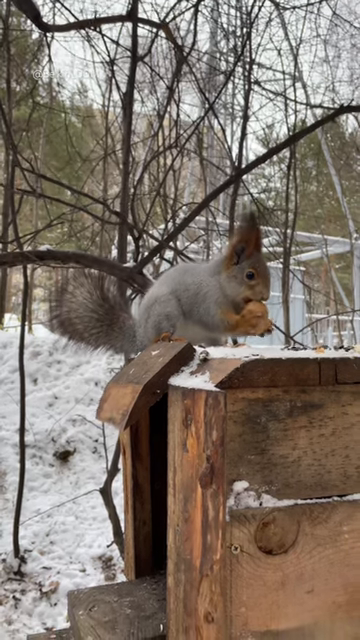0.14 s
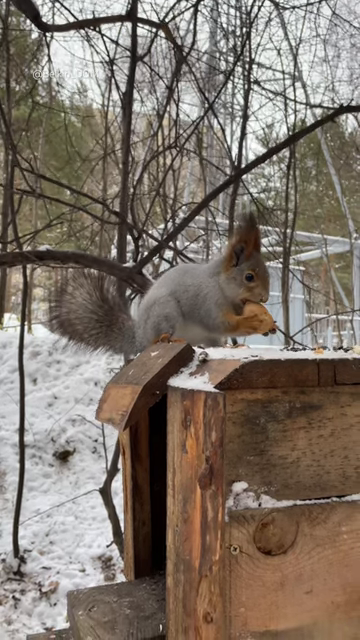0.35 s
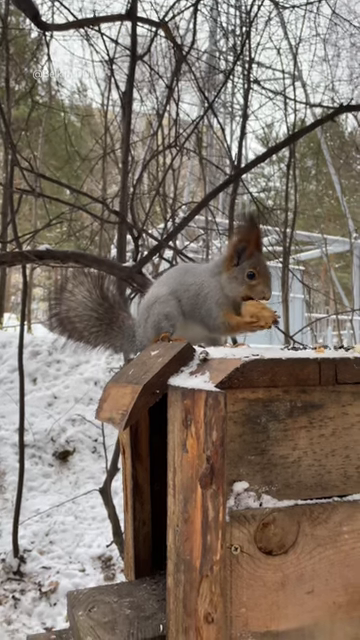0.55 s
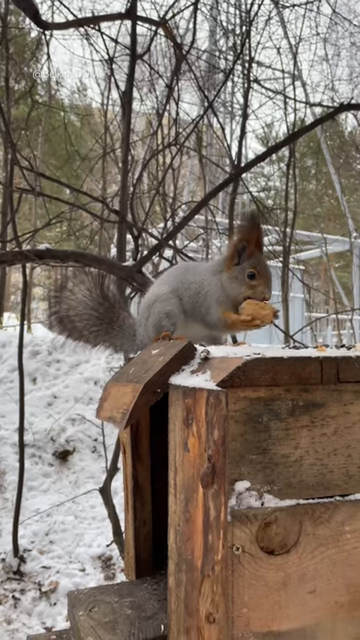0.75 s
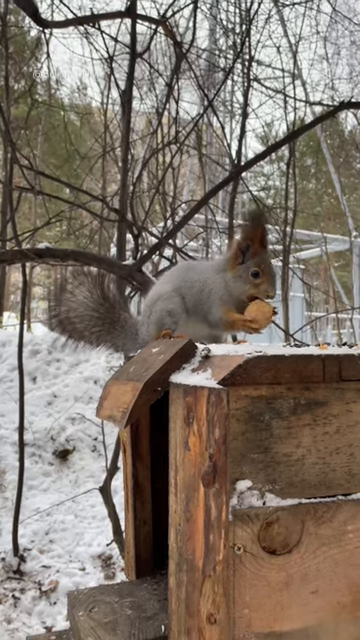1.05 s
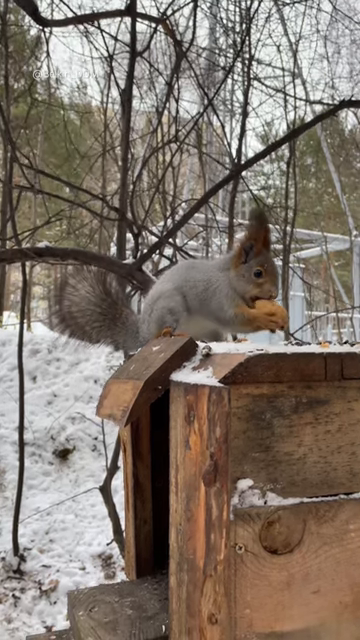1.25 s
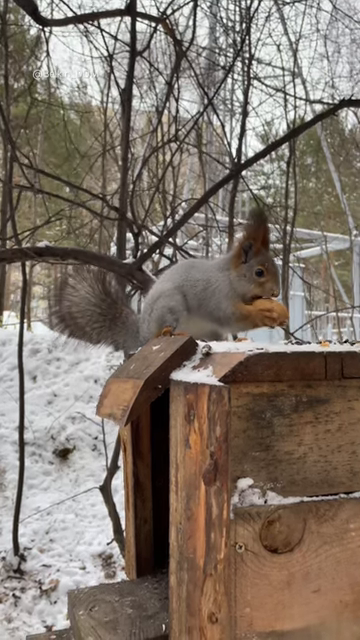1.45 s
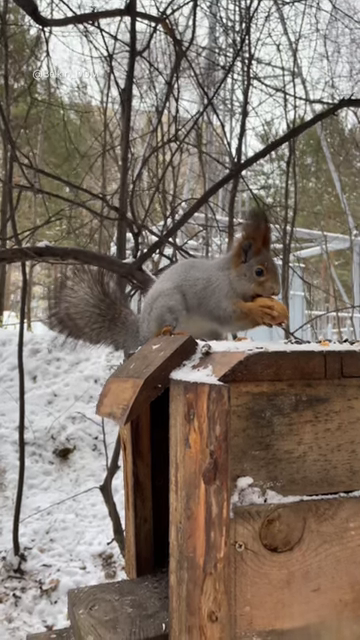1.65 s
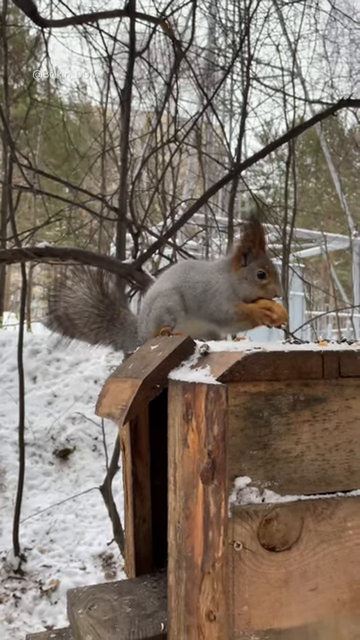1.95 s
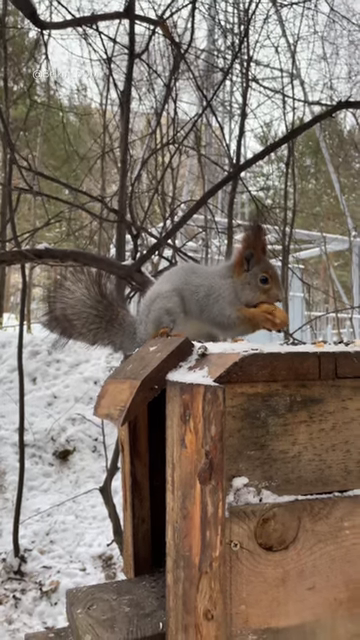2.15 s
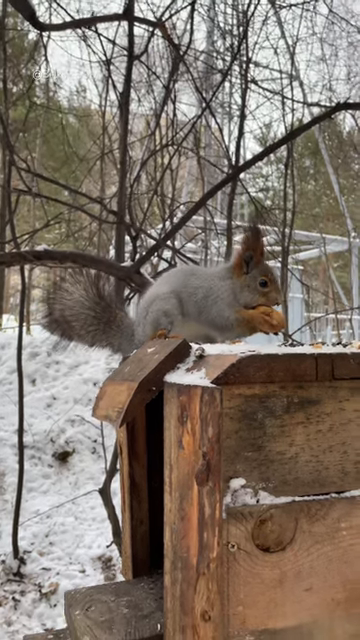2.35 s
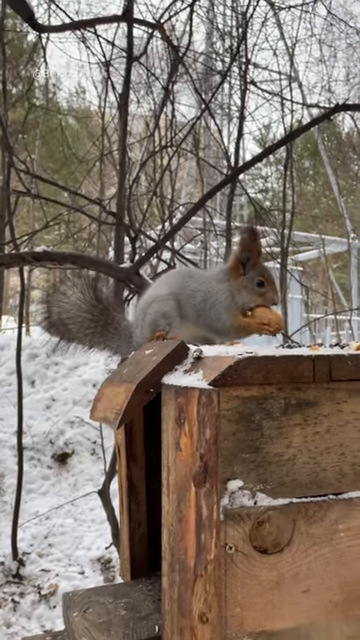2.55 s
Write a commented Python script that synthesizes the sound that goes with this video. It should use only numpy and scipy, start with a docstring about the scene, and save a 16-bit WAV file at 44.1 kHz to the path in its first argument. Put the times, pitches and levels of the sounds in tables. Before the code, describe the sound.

Dry ticking and cracking of a nutshell in a squirrel's teeth, thin bird calls, distant town rumble

```python
"""Dry ticks, snaps, knocks and fine crackle: close by, a squirrel gnaws a nut on a wooden feeder.
Behind it small birds call thinly among the trees, a harsh call dies away and a distant town rumbles.
The nut is clicks, rattles and tiny grains that ring a body. The birds are gliding tones and shaped noise.
The town is coloured noise whose deep part swells and sinks, under a faint hiss."""
import sys
import numpy as np
from scipy import signal
from scipy.fft import rfft, irfft
from scipy.io import wavfile
from scipy.ndimage import uniform_filter1d

SR = 44100
rng = np.random.default_rng(int(sys.argv[2]) if len(sys.argv) > 2 else 0)


def unload_wav(signal):
    """Save mono or channel-first audio to the path in sys.argv[1] as 16-bit WAV at rate SR, clipped to [-1, 1]."""
    wavfile.write(
        sys.argv[1],
        SR,
        np.round(np.clip(np.atleast_2d(signal).T, -1, 1) * 32767).astype(np.int16),
    )


N = 118629  # length in samples
T = np.arange(N) / SR  # time in seconds
HZ = np.fft.rfftfreq(N, 1 / SR)

# Colour of the town's wash. Each row: pitch in Hz, relative strength in dB per Hz.
TOWN_COLOUR = [(12, -79), (25, -39), (34, -10), (44, -3), (56, 1), (72, -3.5), (95, -5.5), (125, -14),
               (148, -9), (168, -12), (200, -10.5), (250, -11.5), (310, -16.5), (490, -17), (600, -20.5),
               (850, -20.5), (1250, -27), (1700, -34.5), (2200, -38.5), (2600, -36.5)]
# How alike the wash is in both ears. Each row: pitch in Hz, likeness from 0 to 1.
TOWN_LIKENESS = [(30, 0.93), (125, 0.99), (250, 0.99), (500, 0.59), (1000, 0.31), (2000, 0.5),
                 (4000, 0.036), (12000, .1)]
# Side of the wash. Each row: pitch in Hz, left minus right in dB.
TOWN_BALANCE = [(30, -0.5), (90, 0.8), (180, 2.5), (350, 2.5), (700, 2.5), (1400, -3.5), (2500, 1.5)]
# Rise and fall of the deep rumble, before RUMBLE_SWING scales it. Each row: time in seconds, level in dB.
RUMBLE_SWELL = [(0.0, -43.5), (0.19, -48), (0.221, -51.5), (0.54, -50.5), (0.61, -32.5), (0.67, -45.5),
                (0.92, -45), (0.98, -55.5), (1.06, -35), (1.11, -43.5), (1.15, -39.5), (1.24, -45),
                (1.27, -42), (1.5, -41.5), (1.71, -56.5), (1.8, -30.5), (1.84, -62), (1.9, -44.5),
                (2.01, -49), (2.07, -50.5), (2.17, -58), (2.25, -47.5), (2.51, -39), (2.53, -61),
                (2.58, -44.5), (2.69, -40.5)]
# Colour of the faint hiss. Each row: pitch in Hz, relative strength in dB per Hz.
HISS_COLOUR = [(1500, -42), (2800, 7.5), (4500, 6), (6500, -1), (8000, -12), (9700, 2.5), (11000, -5),
               (12600, -1), (14300, -24), (15700, -5)]
# Colour of the harsh call's rasp. Each row: pitch in Hz, relative strength in dB.
CAW_COLOUR = [(700, -14), (1250, -2), (1570, 4), (1900, -8), (2400, -16), (2950, -26), (3800, -14.5),
              (5000, -18), (6000, -34), (9000, -41)]
# Thin bird whistles. Each row: start in seconds, length in seconds, start pitch in Hz, middle pitch in Hz,
# end pitch in Hz, level in dB, left minus right in dB.
WHISTLES = [(0.203, 0.063, 7000, 7020, 6800, -76, 5), (0.691, .062, 6730, 7130, 6800, -63.5, 2),
            (0.98, 0.064, 7140, 7040, 6600, -74.5, 3), (1.148, .06, 6550, 7290, 7260, -62.5, 0),
            (1.922, 0.068, 6800, 7200, 7030, -68, 2), (2.296, 0.034, 5420, 4980, 4740, -70.5, -14)]
# Hoarse far bird calls. Each row: start in seconds, length in seconds, level in dB.
HOARSE_CALLS = [(0.87, 0.1, -70.5), (1.402, 0.064, -68.5), (1.696, 0.09, -72), (2.279, 0.093, -70.5)]
# Colour of the hoarse calls. Each row: pitch in Hz, relative strength in dB.
HOARSE_COLOUR = [(2000, -18), (3200, -8), (4300, -9), (5200, -9), (6500, -23), (9000, -29)]
# Scrapes of the teeth. Each row: start in seconds, length in seconds, level in dB.
SCRAPES = [(0.317, 0.14, -68.5), (0.509, 0.1, -71), (0.75, 0.096, -68.5), (0.906, 0.49, -72.5),
           (1.249, 0.025, -63), (1.775, 0.086, -66.5), (1.901, 0.068, -65), (2.076, 0.036, -59),
           (2.179, 0.094, -67.5), (2.348, 0.042, -56.5), (2.535, 0.13, -71.5)]
# Ring of the scraped shell. Each row: pitch in Hz, relative strength in dB.
SCRAPE_COLOUR = [(700, -22), (1400, 6), (2300, 10.5), (3100, -3.5), (6000, -2), (8000, -9), (9600, -7.5),
                 (10700, -1), (12000, -17), (15000, -10)]
# Hollow clacks, when the teeth slip and strike the whole nut.
# Each row: start in seconds, level in dB, extra treble in dB.
CLACKS = [(0.7212, -35.5, -8), (.8745, -28, 1.5), (1.1507, -38.5, 0), (1.1878, -35, -4)]
# Ring of the whole nut. Each row: pitch in Hz, relative strength in dB.
CLACK_COLOUR = [(400, -24), (950, -11), (1380, -2), (1650, -4), (2050, 0), (2550, -3), (2950, -20),
                (4000, -19), (6000, -16), (7000, -26), (8100, -40), (9600, -31), (10650, -16), (12000, -33),
                (15500, -29)]
# Cracks of the shell. Each row: time of the break in seconds, crumbling time in milliseconds,
# then the levels of tick, snap, crunch and knock in dB.
CRACKS = [(0.0422, 1, -59.5, -56.5, -58, -59), (0.0993, 0.31, -56, -85.5, -64.0, -54),
          (0.183, 0.62, -49.5, -71, -80, -56.5), (0.2515, 0.4, -54, -69.5, -65, -64),
          (0.3363, 0.23, -76, -58.5, -71.5, -55), (0.347, 0.69, -72, -67, -67, -63),
          (0.367, 0.36, -84, -78.5, -68, -65.0), (0.3745, 0.44, -53, -64, -67, -61.5),
          (0.392, 0.25, -60, -54, -58, -61), (0.465, 0.21, -71, -49.5, -59, -69.5),
          (0.5585, 0.29, -71, -56, -76, -69), (0.672, 0.42, -78, -85.5, -85, -64.5),
          (0.7755, 0.54, -49.5, -60, -56, -66), (0.9444, 0.25, -70, -55, -62.0, -69.5),
          (0.9555, 0.21, -59, -62, -68.5, -74), (1.042, 0.34, -67, -59.5, -64, -68),
          (1.0945, 0.36, -69, -75.5, -78.5, -67), (1.165, 0.27, -49, -56, -75.0, -65.5),
          (1.1829, 0.75, -57, -62, -75.0, -58.0), (1.2286, 0.88, -55, -73.5, -81.0, -69.5),
          (1.2312, 0.88, -54, -67.5, -81.0, -62), (1.2505, 0.31, -36, -49, -52, -59.0),
          (1.2554, 0.65, -64.5, -58, -68, -53), (1.259, 0.43, -60, -68, -51, -58),
          (1.3614, 0.16, -38.5, -68.0, -83, -69.5), (1.3965, 0.26, -59.5, -74.5, -62, -53),
          (1.434, 0.27, -64.5, -62, -64, -64), (1.4936, 0.23, -72.5, -55, -77, -69.5),
          (1.522, 1, -60, -85.5, -81.0, -74), (1.5793, 0.23, -76, -55, -64.5, -68),
          (1.6853, 1, -61.5, -65, -81.0, -71), (1.7701, 0.25, -55.0, -85.5, -79, -69.5),
          (1.7796, 1, -47.5, -65, -76.5, -65.0), (1.857, 0.25, -65, -85.5, -81.0, -66.0),
          (1.87, 0.78, -76.5, -60.5, -63, -69.5), (1.9083, 0.62, -46.5, -65, -67.0, -69.5),
          (1.9141, 0.4, -58, -74.0, -81.0, -69.5), (1.919, 0.61, -54, -79.5, -81.0, -69.5),
          (1.927, 0.25, -49, -56, -70, -59.0), (1.933, 0.54, -41, -59.5, -55, -61),
          (1.958, 0.41, -52, -65, -81.0, -65.0), (2.0417, 0.39, -48, -66, -83, -66),
          (2.083, 0.59, -58, -70.5, -67.0, -52), (2.0885, 0.87, -47, -52, -59.0, -44.5),
          (2.1041, 0.25, -55, -55.0, -70, -60.0), (2.1112, 0.36, -51, -49.5, -66, -51),
          (2.1302, 0.25, -60, -68, -81.0, -64), (2.1849, 0.27, -31, -53, -41.5, -67),
          (2.1916, 0.38, -56.0, -85.5, -81.0, -72), (2.2126, 0.22, -59, -49, -67.0, -69.5),
          (2.2167, 0.24, -46.5, -53, -66.0, -66.5), (2.236, 0.32, -56.0, -65.0, -74.5, -68.0),
          (2.248, 0.89, -49.5, -61, -60, -68), (2.2569, 0.25, -52, -57, -71, -58.5),
          (2.3575, 0.39, -66, -63, -68, -58.5), (2.3661, 0.5, -51, -58, -72, -48.5),
          (2.374, 0.43, -43, -53, -61, -46), (2.3797, 0.35, -63, -46, -62, -46),
          (2.394, 0.76, -46, -61, -62, -46), (2.3953, 0.47, -50, -40.5, -50.5, -48),
          (2.3992, 0.34, -52, -60.0, -64, -56), (2.4085, 0.25, -50.5, -59, -73, -69.5),
          (2.4319, 0.31, -54, -62, -81.0, -71), (2.4953, 0.25, -63, -63, -69.0, -69.5),
          (2.527, 0.31, -43, -32, -44.5, -45.5), (2.5281, 0.58, -36, -35.5, -65, -41),
          (2.5307, 0.4, -45, -41.5, -63, -48), (2.5802, 0.094, -51, -63, -69, -56.5),
          (2.6716, 0.32, -50, -53, -67.0, -69.5), (2.6765, 0.21, -49, -42, -60, -47.5),
          (2.6805, 0.61, -36, -40, -52, -46), (2.6856, 0.45, -51, -57.0, -63, -64.0)]
# Strength of the tiny fractures beside a main break of 1: in the tick, snap, crunch and knock (plain factors).
CRUMBLE = (0.9, 1.35, 1.2, 1.1)
# The four rings of the cracking shell. Each row: pitch in Hz, relative strength in dB.
TICK_COLOUR = [(2000, -75), (6000, -23), (8000, -28), (8800, -18), (9700, -17.5), (10250, -2.5),
               (10700, 3.5), (11400, -9.5), (13200, -9), (14400, -13), (15600, -17.5), (16400, -21)]
SNAP_COLOUR = [(1500, -31), (3800, -30), (5500, -1.5), (6200, 3.5), (7000, -1), (8000, -11), (9200, -13),
               (11000, -38)]
CRUNCH_COLOUR = [(1200, -18), (2400, -5), (3100, 1), (4300, 2.5), (5300, -3), (6500, -28), (9000, -31)]
KNOCK_COLOUR = [(600, -13), (1100, -22), (2000, 6.5), (2500, 18.5), (3000, -8), (5000, -57)]
# Phase between the two microphone ports. Each row: pitch in Hz, lead of the left in radians.
PORT_PHASE = [(0, -37), (1200, -1.5), (2600, 2.5), (3100, 8.5), (4900, 7), (6370, 8.5), (8700, 10.5),
              (10700, 13), (13000, 14), (15500, 17)]
# Loudness between the ports. Each row: pitch in Hz, left minus right in dB.
PORT_BALANCE = [(1000, 14), (2200, 2), (3800, 0), (6500, -3.5), (10000, 0), (16000, 0)]

TOWN_DB, TOWN_EDGE_HZ = -42, 2370
RUMBLE_TOP_HZ, RUMBLE_SWING = 94, 0.52
HISS_DB, HISS_FLICKER_DB = -80, 3.9
CAW_DB, CAW_HOLD_S, CAW_FADE_DB_PER_S = -51.5, 0.04, 101
CAW_NOTE_HZ, CAW_SAG_HZ_PER_S, CAW_NOTE_DB, CAW_WAVER_HZ = 1603, 990, -4, 56
CAW_UPPER_HZ, CAW_UPPER_DB, CAW_UPPER_S = 2340, -5.5, 0.034  # a higher note that breaks off first
WARBLE_HZ = 109
WOOD_T60, WOOD_DB = 0.16, -5  # T60: seconds for reflections to fall by 60 dB
GRAINS_PER_S, GRAIN_SPREAD_DB, CLUMP_DB = 1300, 1, 3.5
CLACK_TAIL_DB, CLACK_T60, CLACK_TREBLE_HZ = -7, 0.039, 9000
GIVE_SHARE = 1.38  # the crumbling builds up this many times as slowly as it dies away
COLOUR_SPREAD_DB = 7  # each break rings the shell a little differently
NEAR_T60, NEAR_DB = 0.083, -20
EDGE_HZ = 16400


def amp(db):
    """Turns decibels into gain."""
    return 10 ** (np.asarray(db) / 20)


def unit(x):
    """Scales a sound to an rms (average strength) of one."""
    return x / np.sqrt(np.mean(x ** 2) + 1e-30)


def read(points, hz):
    """Reads a table between its rows, along a log-frequency axis."""
    f, value = np.transpose(points)
    return np.interp(np.log(hz + 1), np.log(f + 1), value)


def add(mix, s, sound):
    """Adds a sound to the mix at a time in seconds."""
    start = max(round(s * SR), 0)
    part = mix[..., start:][..., :sound.shape[-1]]
    part += sound[..., :part.shape[-1]]


def pan(db):
    """Left and right gains for a level difference."""
    db = np.atleast_1d(db)
    return amp(np.array([db, -db]) / 2)


def noise(points):
    """Unrelated noise of one colour in each channel."""
    spectrum = rfft(rng.standard_normal((2, N)))
    return unit(irfft(spectrum * amp(read(points, HZ)), N))


def wander(shape, size):
    """Smooth chance with an rms of one; a larger size in samples is slower."""
    once = uniform_filter1d(rng.standard_normal(shape), size)
    return unit(uniform_filter1d(once, size))


def ring(points, size=1024):
    """The ring of a struck body with this spectrum, which starts at once (minimum phase)."""
    hz = abs(np.fft.fftfreq(size, 1 / SR))
    log_gain = np.log(amp(read(points, hz)))
    spectrum = np.exp(np.conj(signal.hilbert(log_gain)))
    return np.fft.ifft(spectrum).real[:size // 2]


def at_level(sound, db, size=28):
    """Scales a click so that its smoothed envelope peaks at this level."""
    power = uniform_filter1d(abs(signal.hilbert(sound)) ** 2, size)
    return amp(db) * sound / np.sqrt(power.max())


def echoes(x, t60):
    """Diffuse reflections: the sound smeared by noise that dies away."""
    t = T[:SR // 2]
    tail = rng.standard_normal((2, len(t))) * amp(-60 * t / t60)
    tail /= np.linalg.norm(tail[0])
    return signal.fftconvolve(x, tail, axes=1)[:, :N]


def town():
    """A far traffic wash whose deep rumble swells and sinks, under a faint flickering hiss."""
    left, other = rfft(rng.standard_normal((2, N)))
    same = np.clip(read(TOWN_LIKENESS, HZ), -1, 1)
    right = same * left + np.sqrt(1 - same ** 2) * other
    wash = np.array([left, right]) * pan(read(TOWN_BALANCE, HZ))
    wash *= amp(read(TOWN_COLOUR, HZ)) / np.sqrt(1 + (HZ / TOWN_EDGE_HZ) ** 20)
    deep = 1 / (1 + (HZ / RUMBLE_TOP_HZ) ** 4)
    s, db = np.transpose(RUMBLE_SWELL)
    swell = amp(RUMBLE_SWING * (np.interp(T, s, db) - db.mean()))
    rumble = irfft(wash * deep, N) * swell
    steady = irfft(wash * (1 - deep), N)
    hiss = amp(HISS_DB + HISS_FLICKER_DB * wander(N, size=3000)) * noise(HISS_COLOUR)
    return amp(TOWN_DB) * unit(rumble + steady) + hiss


def caw():
    """The end of a harsh bird call: a sagging, unsteady note and a brief higher one in diffuse rasp."""
    hz = CAW_NOTE_HZ - CAW_SAG_HZ_PER_S * T + CAW_WAVER_HZ * wander(N, size=150)
    tone = np.sin(2 * np.pi * np.cumsum(hz) / SR)
    note = amp(CAW_NOTE_DB) * unit(echoes(tone[None], t60=0.026))
    upper_hz = CAW_UPPER_HZ + 2 * CAW_WAVER_HZ * wander(N, size=60)
    upper = np.sin(2 * np.pi * np.cumsum(upper_hz) / SR)
    upper *= amp(CAW_UPPER_DB) * np.sin(np.pi * np.minimum(T / CAW_UPPER_S, 1))
    fade = amp(CAW_DB - CAW_FADE_DB_PER_S * np.maximum(T - CAW_HOLD_S, 0))
    return (noise(CAW_COLOUR) + note + upper) * fade


def whistles():
    """Thin calls: pure tones whose pitch glides along a curve and warbles by chance."""
    out = np.zeros((2, N))
    for s, length, *pitches, db, side_db in WHISTLES:
        u = np.linspace(0, 1, round(length * SR))
        glide = np.polyval(np.polyfit([0, 0.5, 1], pitches, 2), u)
        hz = glide + WARBLE_HZ * wander(len(u), size=90)
        phase_gap = np.array([[0], [read(PORT_PHASE, hz.mean())]])  # left and right port
        tone = np.sin(2 * np.pi * np.cumsum(hz) / SR - phase_gap)
        add(out, s, amp(db) * pan(side_db) * np.sqrt(np.hanning(len(u))) * tone)
    return out


def hoarse_calls():
    """Hoarse far calls: coloured noise that swells and fades."""
    level = np.zeros(N)
    for s, length, db in HOARSE_CALLS:
        add(level, s, amp(db) * np.hanning(round(length * SR)))
    return level * noise(HOARSE_COLOUR)


def birds():
    """Whistles and hoarse calls, with reflections from among the trees."""
    calls = whistles() + hoarse_calls()
    return calls + amp(WOOD_DB) * echoes(calls, WOOD_T60)


def scrapes():
    """The teeth drag over the shell and shed many tiny grains, each of which rings it."""
    level = np.zeros(N)
    for s, length, db in SCRAPES:
        add(level, s, amp(db) * np.sqrt(np.hanning(round(length * SR))))
    grains = rng.choice([-1, 1], N) * (rng.random(N) < GRAINS_PER_S / SR)
    spread_db = GRAIN_SPREAD_DB * np.minimum(rng.exponential(1, N), 3)
    grains = grains * amp(spread_db + CLUMP_DB * wander(N, size=120))
    body = ring(SCRAPE_COLOUR)
    body /= np.linalg.norm(body)
    return signal.fftconvolve(level * unit(grains), body)[:N]


def clacks():
    """One clean blow rings the whole nut, with a very short rattle after it."""
    out, t = np.zeros(N), T[:SR // 25]
    for s, db, treble_db in CLACKS:
        rattle = rng.standard_normal(len(t)) * amp(-60 * t / CLACK_T60)
        force = amp(CLACK_TAIL_DB) * rattle / np.linalg.norm(rattle)
        force[0] += 1  # the blow
        body = ring([(hz, level + treble_db * (hz > CLACK_TREBLE_HZ)) for hz, level in CLACK_COLOUR])
        add(out, s, at_level(np.convolve(force, body), db))
    return out


def cracks(lead=130):
    """Each break is a sharp click within a brief crumbling, which ring the shell."""
    out = np.zeros(N)
    ms = 1000 * (T[:SR // 70] - T[lead])  # the break comes at 0, "lead" samples in
    colours = (TICK_COLOUR, SNAP_COLOUR, CRUNCH_COLOUR, KNOCK_COLOUR)
    for s, crumble_ms, *levels in CRACKS:
        shape = np.exp(-np.maximum(ms, -ms / GIVE_SHARE) / crumble_ms)
        for colour, crumble, db in zip(colours, CRUMBLE, levels):
            fractures = rng.standard_normal(len(ms)) * (rng.random(len(ms)) < 0.3)
            force = crumble * shape * fractures
            force[lead] += 1  # the main break
            body = ring([(hz, level + COLOUR_SPREAD_DB * rng.uniform(-1, 1)) for hz, level in colour])
            add(out, s - T[lead], at_level(np.convolve(force, body), db))
    return out


def squirrel():
    """The gnawing reaches two microphone ports a little apart, with faint reflections from the feeder."""
    left = rfft(cracks() + clacks() + scrapes())
    right = left * np.exp(-1j * read(PORT_PHASE, HZ))
    direct = irfft(np.array([left, right]) * pan(read(PORT_BALANCE, HZ)), N)
    return direct + amp(NEAR_DB) * echoes(direct, NEAR_T60)


def scene():
    """The squirrel in front, birds and town behind."""
    return squirrel() + birds() + caw() + town()


def record(dry):
    """The recorder's band limit: a filter removes what lies above its top pitch."""
    low_pass = signal.firwin(401, EDGE_HZ, window=("kaiser", 9), fs=SR)
    return signal.oaconvolve(dry, low_pass[None], "same")


dry = scene()
out = record(dry)
unload_wav(out)
```